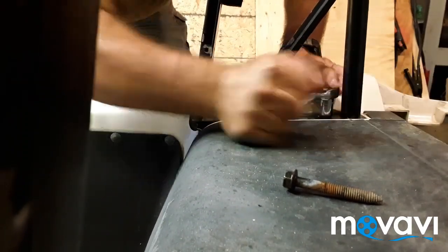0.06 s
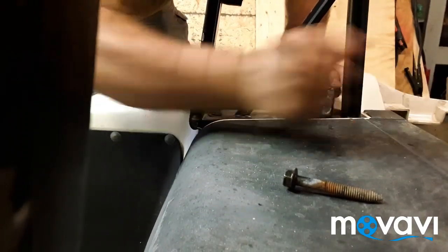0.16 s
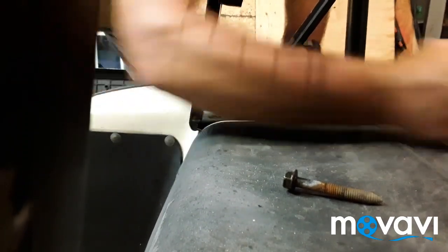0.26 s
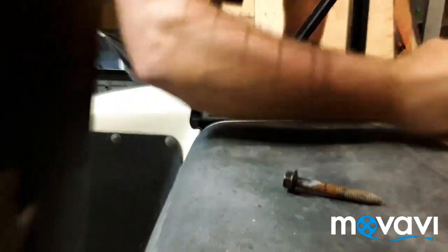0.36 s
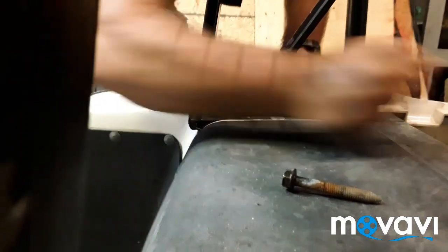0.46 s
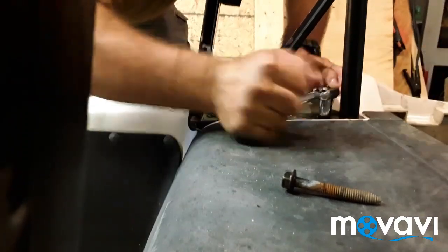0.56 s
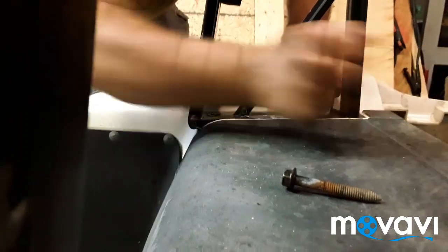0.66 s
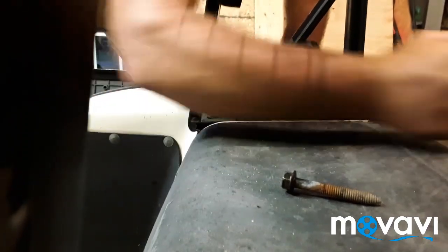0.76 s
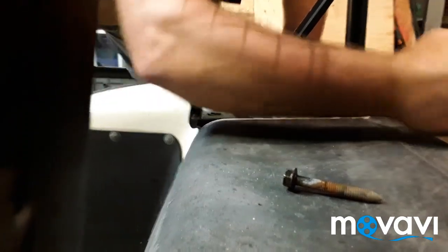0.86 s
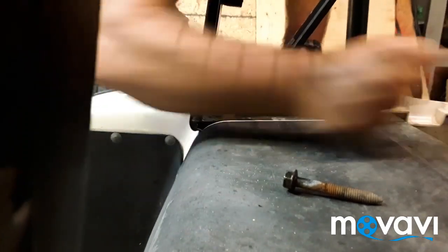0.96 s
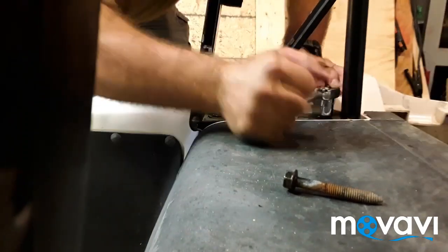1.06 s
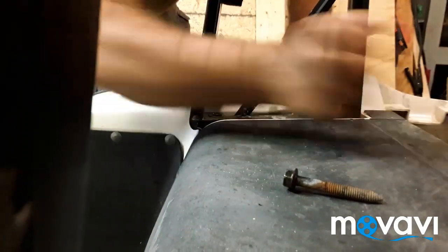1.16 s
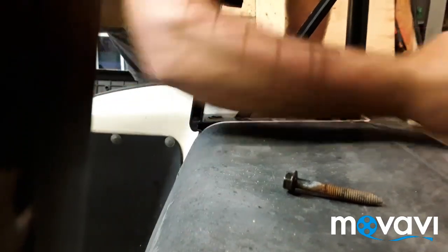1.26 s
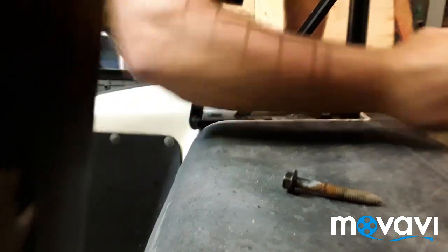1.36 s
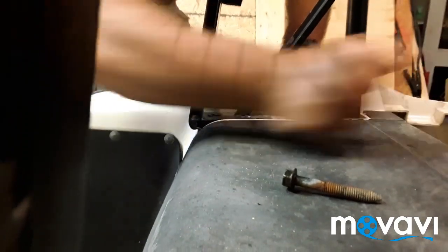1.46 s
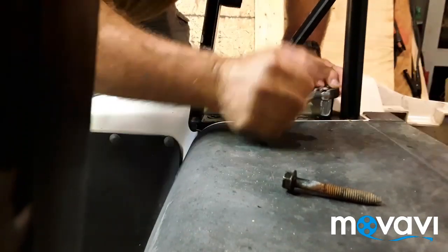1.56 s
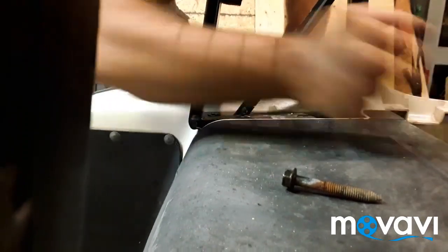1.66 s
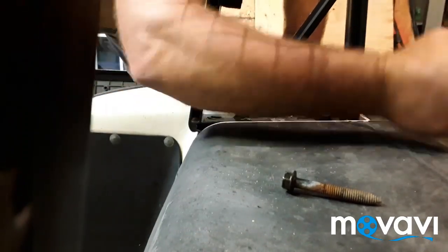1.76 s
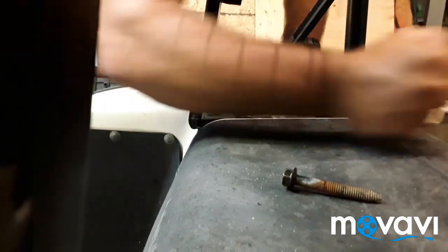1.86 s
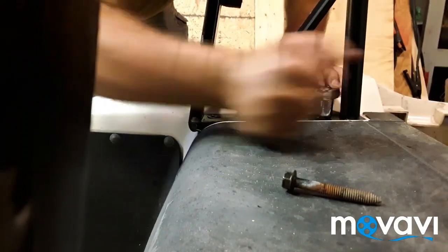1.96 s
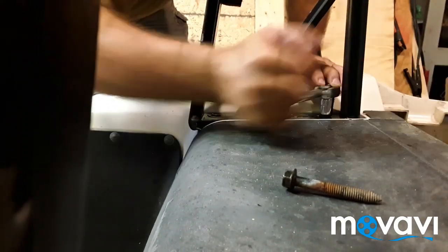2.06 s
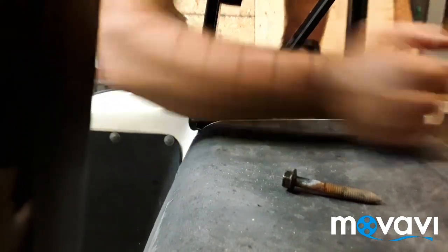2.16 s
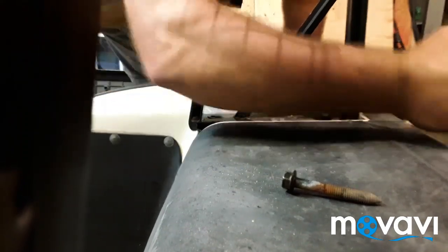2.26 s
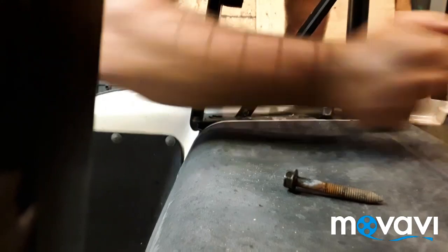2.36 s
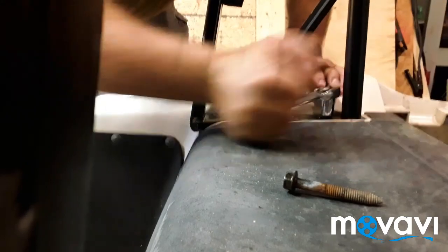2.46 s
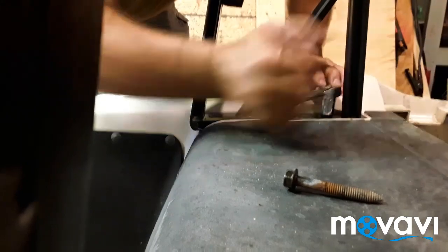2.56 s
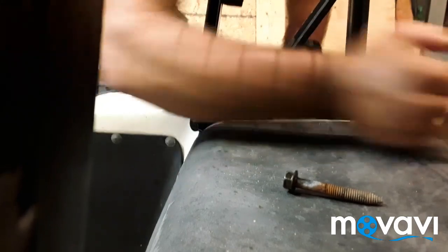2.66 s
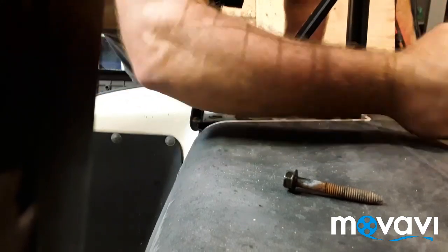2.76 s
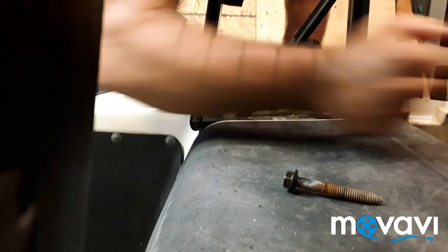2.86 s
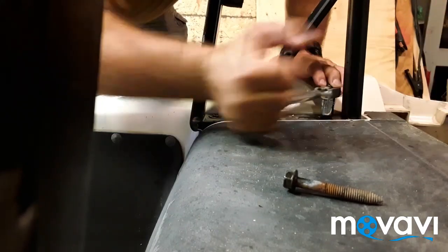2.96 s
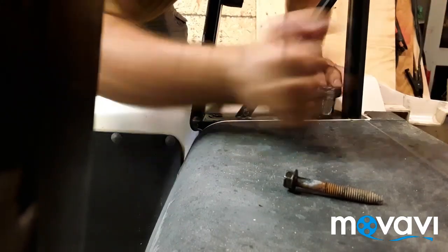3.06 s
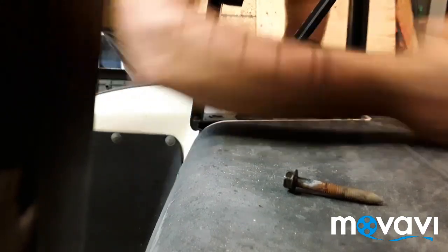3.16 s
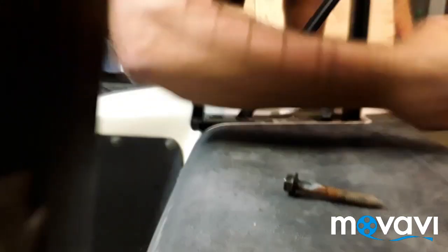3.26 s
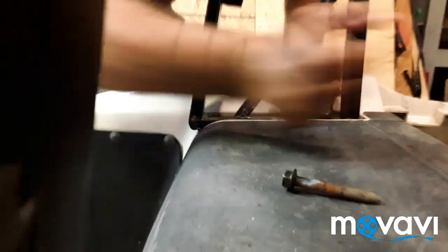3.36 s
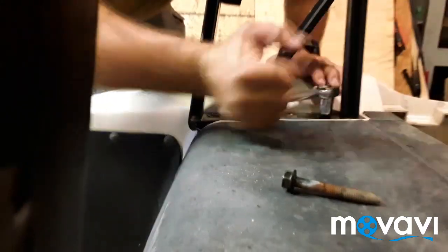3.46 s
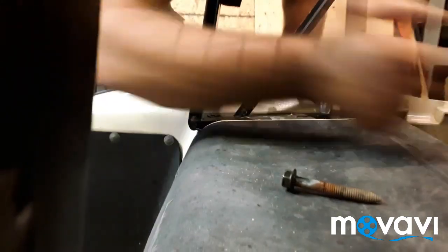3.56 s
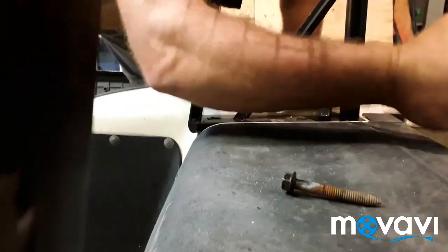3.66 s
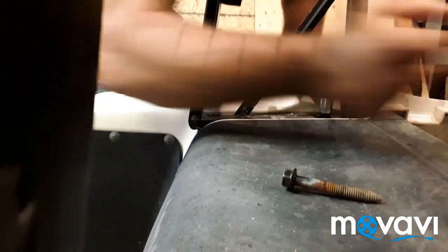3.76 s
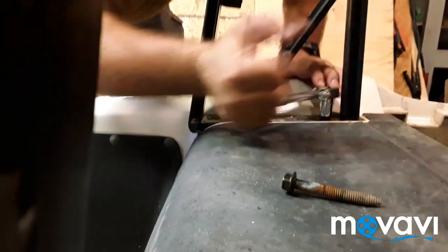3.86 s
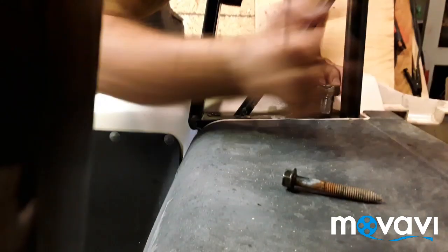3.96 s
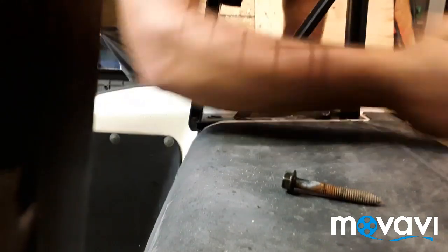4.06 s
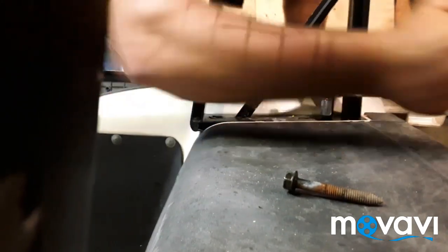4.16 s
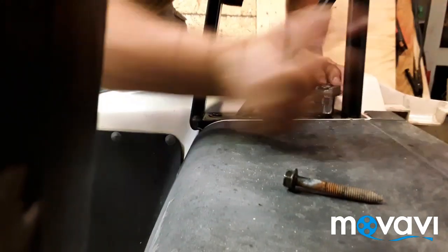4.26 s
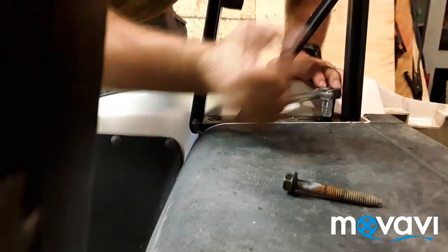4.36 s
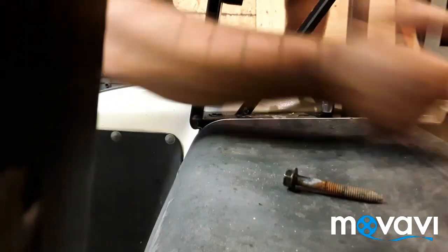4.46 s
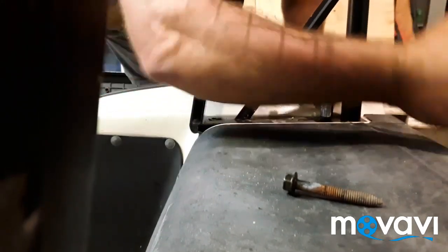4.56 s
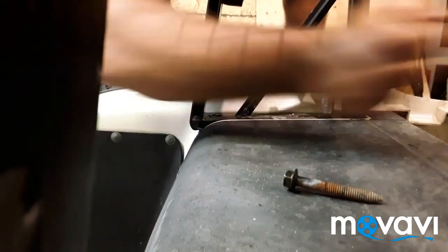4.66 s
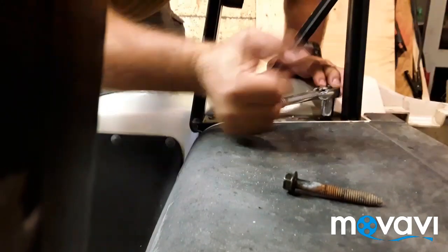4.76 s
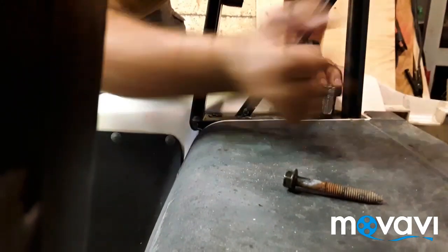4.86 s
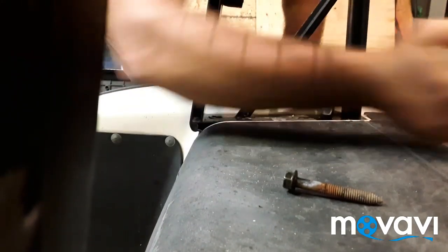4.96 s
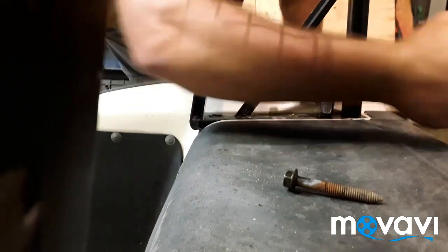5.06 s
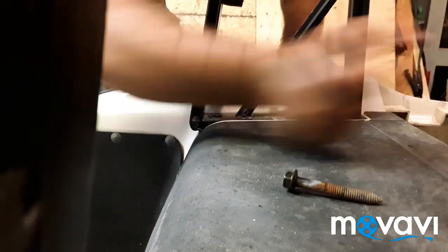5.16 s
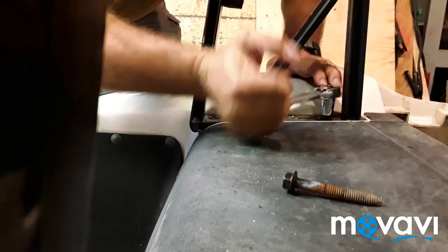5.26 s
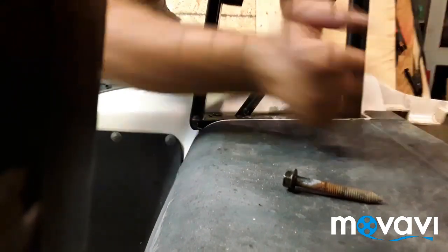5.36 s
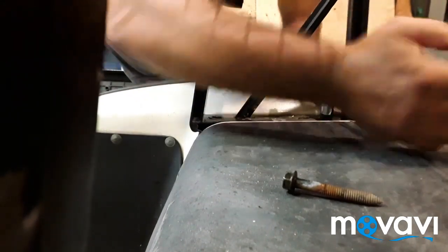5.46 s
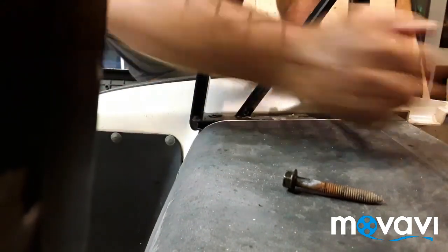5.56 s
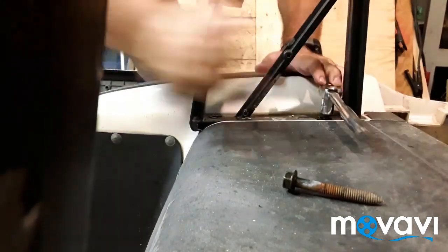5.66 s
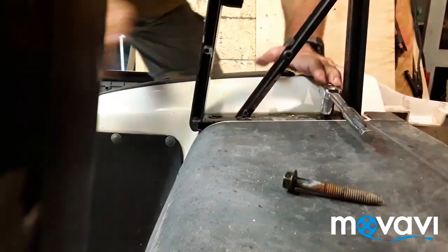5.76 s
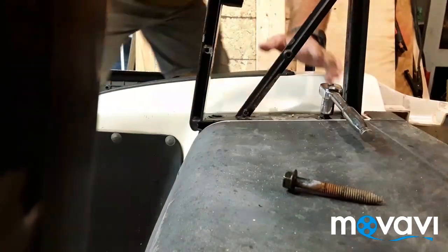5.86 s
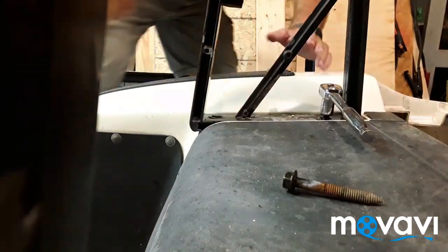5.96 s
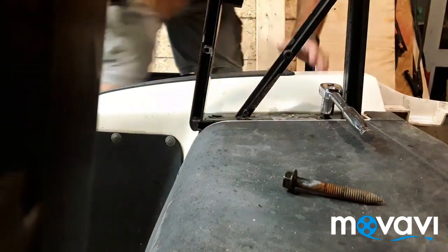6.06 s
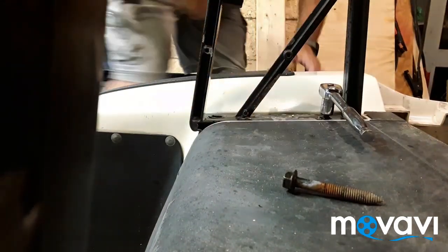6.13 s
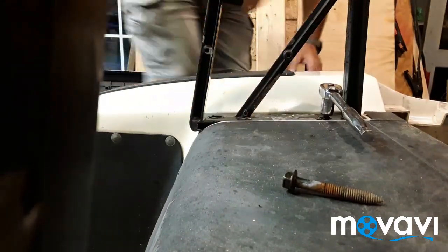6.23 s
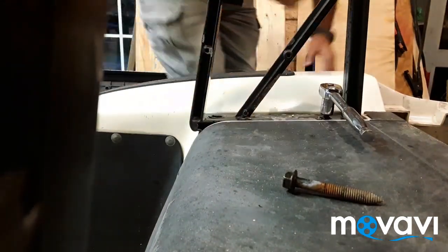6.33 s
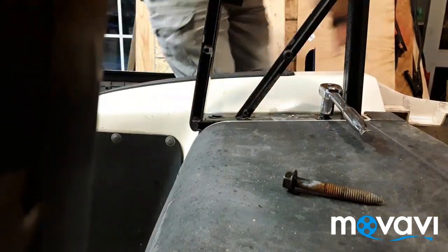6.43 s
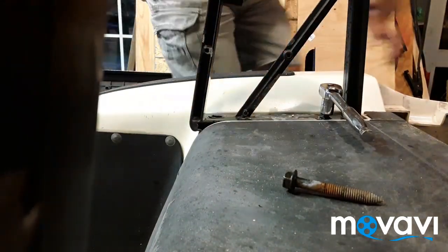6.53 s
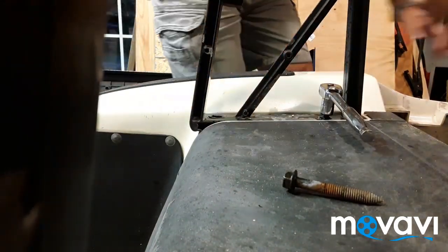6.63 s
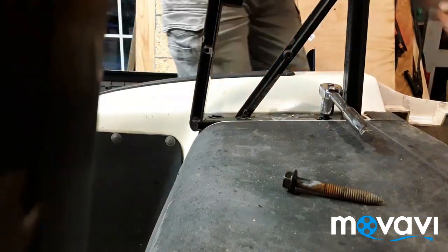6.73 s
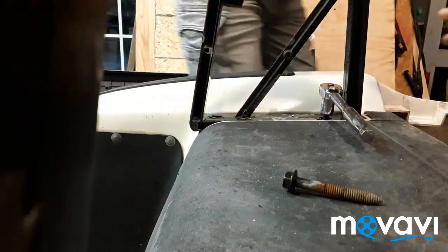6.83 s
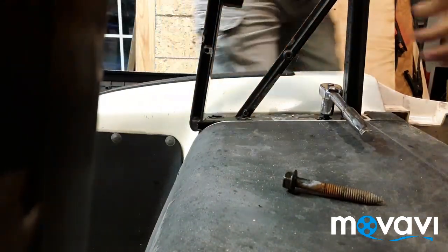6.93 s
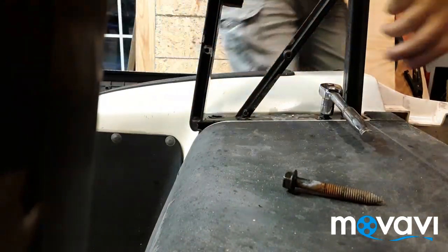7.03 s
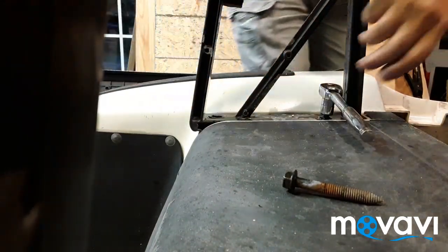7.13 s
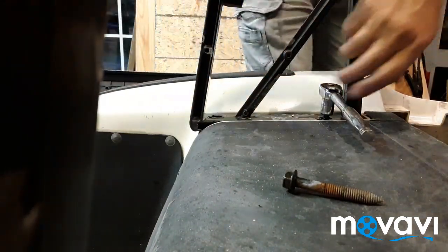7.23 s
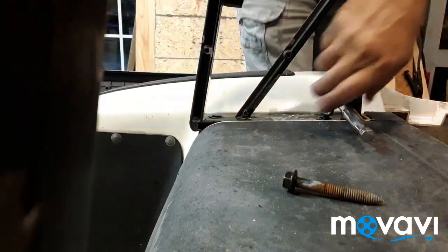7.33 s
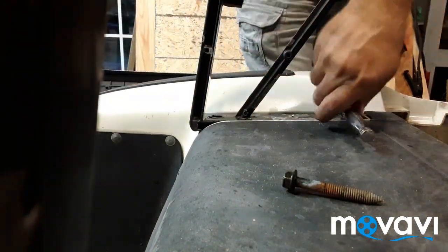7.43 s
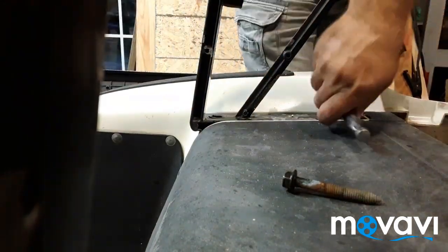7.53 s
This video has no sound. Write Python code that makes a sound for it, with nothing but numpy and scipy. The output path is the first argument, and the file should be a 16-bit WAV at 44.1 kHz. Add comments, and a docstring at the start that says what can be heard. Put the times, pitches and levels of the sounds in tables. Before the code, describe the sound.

In a small garage, a socket wrench ratchets close to one microphone: bright runs of four or five fast clicks, about twice a second. Between runs the socket knocks metallically against the bolt, the thread squeaks briefly, and a forearm bumps and rubs a dull plastic panel. After about five and a half seconds the ratcheting ends, leaving soft cloth rustle, faint ticks, a distant-sounding cricket and very low air noise.

```python
"""Ratchet on a rusty bolt

Small garage, one microphone: a socket ratchet backs a bolt out of a bracket on a vehicle's plastic body.
Noise bursts through resonances make the pawl's clicks, socket knocks and panel thuds; bare bursts make dry
ticks; pulse trains make the thread squeak; shaped noise is hand and arm rubbing, then trousers brushing as
the worker lets go and steps round. A cricket nearby chirps in sagging tones, over faint steady air noise.
"""
import sys
import numpy as np
from scipy import signal
from scipy.fft import rfft, irfft, next_fast_len
from scipy.io import wavfile
from scipy.ndimage import uniform_filter1d

SR = 44100
rng = np.random.default_rng(int(sys.argv[2]) if len(sys.argv) > 2 else 0)


def dump(signal):
    """Clip the signal to [-1, 1] and save it as 16-bit WAV at the path in sys.argv[1]."""
    limited = np.clip(np.atleast_2d(signal).T, -1, 1)
    pcm = np.round(limited * 32767).astype(np.int16)
    wavfile.write(sys.argv[1], SR, pcm)


N = 334719
TIME = np.arange(N) / SR
CUTOFF_HZ = 16200

# All event levels below are before the trims (snap_db, tap_db ...) in each function's arguments.
# socket taking up its slack against the bolt head: start_s, level_db, treble_db
SLACK_KNOCKS = [(0.376, -28.5, -54), (1.357, -20, -27.5), (1.93, -35, -37), (2.323, -22, -36),
                (2.842, -34.5, -62), (3.182, -34, -27), (3.27, -16, -20.5), (3.304, -27, -38),
                (3.733, -21.5, -32), (4.074, -34.5, -30), (4.164, -17.5, -21), (4.628, -23.5, -32.5),
                (5.089, -21.5, -25.5), (5.368, -29.5, -48), (5.675, -44, -59), (5.927, -46.5, -51),
                (6.439, -47, -57), (7.294, -67, -66), (7.413, -55.5, -60)]
# ring of the steel ratchet head: pitch_hz, width_hz, level_db (above the snap)
HEAD_RING = [(7050, 79, -1.5), (6900, 120, -19), (7626, 83, 18.5), (8297, 410, 17), (11290, 400, 8),
             (12980, 300, 5)]
# ring of bolt and bracket: pitch_hz, width_hz, level_db (above the blow)
BRACKET_RING = [(655, 70, 15.5), (860, 190, 6), (1072, 14, 7), (1162, 64, 8.5), (1392, 89, 4.5),
                (1790, 41, -17.5), (1943, 11, 14), (2160, 19, 2.5), (2313, 120, 10.5), (2695, 19, 9.5),
                (3166, 200, 12)]
# colour of steel snapping on steel: pitch_hz, level_db (per Hz)
SNAP_COLOUR = [(1000, -29.5), (3000, -9.5), (4500, -2), (6000, -4), (8000, 2), (9000, 0), (10000, -4.5),
               (12500, -9.5), (16000, -22.5)]
# dull colour of the leaned-on or struck panel: pitch_hz, level_db (per Hz)
RUMBLE_COLOUR = [(25, -20.5), (50, -19.5), (85, -3.5), (130, 1.5), (260, -2), (450, -7), (900, -14),
                 (3000, -64)]


def from_db(db):
    """Decibels to gain."""
    return 10 ** (np.asarray(db) / 20)


def rms_one(x):
    """Scale to unit rms."""
    return x / np.sqrt(np.mean(x ** 2) + 1e-20)


def peak_one(x, size):
    """Scale so that the loudest stretch of `size` samples has unit rms."""
    return x / np.sqrt(uniform_filter1d(x ** 2, size).max() + 1e-20)


def at_hz(points, hz):
    """Read a table on a log-frequency axis."""
    f, value = np.transpose(points)
    return np.interp(np.log(np.maximum(hz, 1)), np.log(f), value)


def add(out, s, sound):
    """Mix a sound in at time s."""
    i = max(int(s * SR), 0)
    out[i:i + len(sound)] += sound[:max(N - i, 0)]


def drift(rate, size):
    """Random line through `rate` points a second, within +-2 and with a spread of about 1."""
    knots = np.arange(size) * rate / SR
    return np.interp(knots, np.arange(size), rng.uniform(-2, 2, size))


def colour(x, spectrum, modes=(), vary_db=0):
    """Causal filter: a smooth spectrum with resonances, each excited with a strength of its own."""
    size = next_fast_len(len(x) + 4096) * 2
    hz = np.arange(size // 2 + 1) * SR / size
    power = np.ones(len(hz))
    for centre, width, db in modes:
        peak = from_db(db + vary_db * rng.standard_normal()) ** 2
        power += peak / (1 + (2 * (hz - centre) / width) ** 2)
    cepstrum = irfft(np.log(from_db(at_hz(spectrum, hz)) * np.sqrt(power)))
    # minimum phase: nothing sounds before its cause
    cepstrum[1:size // 2] *= 2
    cepstrum[size // 2 + 1:] = 0
    response = np.exp(rfft(cepstrum))
    return irfft(rfft(x, size) * response)[:len(x)]


def burst(t60, size, delay=0):
    """A rough burst: noise that starts after `delay` and falls by 60 dB in t60 seconds."""
    t = TIME[:size] - delay
    return rng.standard_normal(size) * (t >= 0) * from_db(-60 * np.abs(t) / t60)


def garage(x, wet_db, build_s):
    """Direct sound plus a diffuse tail that builds up and dies band by band."""
    # garage reverberation: pitch_hz, t60_s
    decay_times = [(100, 0.42), (500, 0.21), (2000, 0.35), (5000, 0.42), (8500, 0.33), (15000, 0.39)]
    t, tail = TIME[:SR * 3 // 4], 0
    white, hz = rfft(rng.standard_normal(len(t))), np.fft.rfftfreq(len(t), 1 / SR)
    edges = np.geomspace(30, SR / 2, 13)
    for low, high in zip(edges, edges[1:]):
        band = irfft(white * (hz >= low) * (hz < high), len(t))
        tail = tail + band * from_db(-60 * t / at_hz(decay_times, np.sqrt(low * high)))
    tail = tail * (1 - np.exp(-t / build_s))
    return x + from_db(wet_db) * signal.fftconvolve(x, tail / np.linalg.norm(tail))[:N]


def background_air(level_db=-66.5):
    """Faint steady background: noise of one fixed colour."""
    # pitch_hz, level_db (per Hz)
    air_colour = [(25, -16.5), (60, -4), (120, 1.5), (300, 3.5), (700, -1.5), (1500, -18), (2300, -20.5),
                  (3200, -40.5), (6500, -30.5), (8300, -11), (10500, -32), (16000, -39.5)]
    return from_db(level_db) * rms_one(colour(rng.standard_normal(N), air_colour))


def handling(rumble_db=-1.5, scuff_db=-6.0, lumpy_db=5.5, grain_db=5.5):
    """Hand and arm lean and rub on the panel; harder pressure raises rumble and scuff together."""
    # pressure of hand and arm on wrench and panel, as rubbing level: time_s, level_db
    pressure = [(0, -57.5), (0.55, -49), (1.0, -54), (1.72, -42.5), (1.95, -61), (2.45, -44.5),
                (3.1, -54.5), (3.4, -37.5), (3.9, -52), (4.3, -42), (4.95, -50.5), (5.4, -40.5),
                (5.55, -57), (5.75, -52.5), (6.0, -77), (6.45, -66), (7.2, -71), (7.5, -64.5)]
    # colour of the rubbing: pitch_hz, level_db (per Hz)
    scuff_colour = [(250, 3), (600, -19), (1200, 8.5), (2300, 2.5), (3500, -8), (6500, -10), (8300, 9.5),
                    (10000, -12), (16000, -32)]
    pressure_db = np.interp(TIME, *np.transpose(pressure))
    rumble_level = from_db(rumble_db + lumpy_db * drift(40, size=N))
    rumble = rms_one(colour(rng.standard_normal(N), RUMBLE_COLOUR)) * rumble_level
    scuff_level = from_db(scuff_db + grain_db * drift(60, size=N))
    scuff = rms_one(colour(rng.standard_normal(N), scuff_colour)) * scuff_level
    return from_db(pressure_db) * (rumble + scuff)


def clicks():
    """Teeth pass evenly on each swing, the last one late as the hand brakes: (s, snap, bracket, ping dB)."""
    # return swings of the handle: start_s, teeth_count, tooth_s (per tooth), late_s (last tooth),
    # snap_db, bracket_db (passed into the bracket), ping_db (socket)
    swings = [(0.0687, 4, .030, .006, -15, -37, -36), (0.538, 5, .0306, .018, -16.5, -39, -37),
              (1.0534, 4, .0305, .0073, -14, -35, -33), (1.5135, 4, .0324, 0, -12, -32, -31),
              (2.0062, 4, .0306, .0114, -11.5, -33, -25), (2.4634, 5, .0281, .005, -11.5, -32, -34),
              (2.9732, 4, .0282, .002, -14, -32, -37), (3.4049, 5, .027, .0077, -11.5, -30, -35),
              (3.8636, 4, .0274, .0054, -11.5, -30.5, -44), (4.2971, 5, .0256, 0, -11.5, -31.5, -43),
              (4.755, 5, .0255, .0126, -13, -31, -35), (5.2235, 5, .027, .016, -11.5, -31, -38)]
    # single clicks outside the even runs: start_s, snap_db
    lone_clicks = [(0.0014, -19.5), (1.1891, -19), (1.4092, -24)]
    lone_tap_db, lone_ping_db = -19, -23.5   # relative to the snap
    # the socket is still tight on the first tooth; the hand gathers force
    first_ping_db, snap_rise_db_per_tooth = -12.5, 0.35
    snap_spread_db, ping_spread_db = 1.4, 5   # from tooth to tooth
    rows = [(s, db, db + lone_tap_db, db + lone_ping_db) for s, db in lone_clicks]
    for start, count, tooth_s, late_s, db, bracket_db, socket_db in swings:
        for k, (force, seating) in enumerate(rng.standard_normal((count, 2))):
            rows.append((start + k * tooth_s + late_s * (k == count - 1),
                         db + snap_rise_db_per_tooth * (k - count / 2) + snap_spread_db * force,
                         bracket_db + snap_spread_db * force,
                         socket_db + first_ping_db * (k == 0) + ping_spread_db * seating))
    return rows


def ratchet(snap_db=-6.5, tap_db=-1.0, ping_db=-5.0, snap_t60=0.0096, tap_t60=0.055, ping_t60=.025,
            ping_hz=4170, rebound_s=.0028, rebound_db=1.0):
    """The pawl snaps and rebounds at each click; the head rings, the socket pings, the bracket is tapped."""
    # colour of the tap passed to the bracket: pitch_hz, level_db (per Hz)
    tap_colour = [(150, -7), (500, -1.5), (900, -7), (1600, 5.5), (2500, -1), (3500, -10.5), (6000, -21)]
    out, pings, t = np.zeros(N), np.zeros(N), TIME[:3000]
    for s, db, bracket_db, socket_db in clicks():
        rebound_gain = from_db(rebound_db + 2 * rng.standard_normal())
        rebound = rebound_gain * burst(snap_t60, size=3000, delay=rebound_s * rng.uniform(0.23, 1.4))
        snap = colour(burst(snap_t60, size=3000) + rebound, SNAP_COLOUR, HEAD_RING, vary_db=2.0)
        tap = colour(burst(tap_t60, size=6000), tap_colour, BRACKET_RING, vary_db=3.0)
        # the socket sits a little differently at every click
        seated_hz = ping_hz * (1 + 0.012 * rng.standard_normal())
        ping = np.sin(2 * np.pi * seated_hz * t) * from_db(-60 * t / ping_t60)
        add(out, s, from_db(db + snap_db) * peak_one(snap, size=130))
        add(out, s, from_db(bracket_db + tap_db) * peak_one(tap, size=400))
        add(pings, s, from_db(socket_db + ping_db) * peak_one(ping, size=400))
    return garage(out, wet_db=-2.0, build_s=0.002) + garage(pings, wet_db=-6.5, build_s=0.0015)


def thread(squeak_db=-1.0, jitter=0.0736, wander=.04, flutter_db=2.0):
    """Stick-slip in the rusty thread: a pulse per slip, its rate gliding with the pull; rust adds wander, grit."""
    # thread sticking and slipping: start_s, hold_s, release_s, start_hz (slips per s),
    # full_hz (slips per s at full pull), held_db, unevenness (0-1), grit_db (relative to the slips)
    squeaks = [(0.283, 0.1, 0.044, 960, 1320, -19, 0.8, 2.5),
               (0.837, .038, 0.11, 770, 885, -16, 0.54, -3.5),
               (1.267, 0.015, 0.034, 1150, 1220, -22, 0.5, -2),
               (2.207, 0.0099, 0.05, 3100, 3020, -21.5, .45, -15.5),
               (4.088, 0.018, 0.066, 2900, 3130, -20, .55, -25)]
    # colour of a slip: pitch_hz, level_db (per Hz)
    slip_colour = [(300, -27.5), (800, 0), (1300, -1.5), (2500, -2), (3400, -10.5), (4600, -9),
                   (6000, -4.5), (7200, 0.5), (8700, 4.5), (10000, -11), (12500, -19), (16000, -40.5)]
    # ring of the bolt shank while it squeaks: pitch_hz, width_hz, level_db (above the slip)
    shank_ring = [(2270, 160, 4), (2760, 450, -12.5), (4270, 190, 12), (5820, 130, 9.5), (7800, 200, 4.5),
                  (8400, 200, 6.5)]
    attack_s, onset_db, release_db = .005, -7.5, -23   # levels at start and end, relative to the hold
    sag = .07   # share by which the slip rate drops as the pull relaxes
    out = np.zeros(N)
    for s, hold_s, release_s, start_hz, full_hz, held_db, rough, grit_db in squeaks:
        end_s = hold_s + release_s
        t = np.arange(0, end_s, 1 / SR)
        hz = np.interp(t, [0, hold_s, end_s], [start_hz, full_hz, full_hz * (1 - sag)])
        attack = onset_db * np.maximum(1 - t / attack_s, 0)
        release = release_db * np.maximum(t - hold_s, 0) / release_s
        db = held_db + attack + release
        unevenness = jitter * drift(900, size=len(t)) + wander * drift(160, size=len(t))
        phase = 2 * np.pi * np.cumsum(hz * (1 + rough * unevenness)) / SR
        slips = rms_one(sum(np.cos(k * phase) * (k * hz < CUTOFF_HZ) for k in range(1, 20)))
        grit = from_db(grit_db) * rng.standard_normal(len(t))
        squeak = colour(slips + grit, slip_colour, shank_ring)
        # level out the ringing, so that the pull and a light flutter set the loudness
        squeak /= np.sqrt(uniform_filter1d(squeak ** 2, size=400) + 1e-12)
        add(out, s, squeak * from_db(db + squeak_db + flutter_db * drift(300, size=len(t))))
    return garage(out, wet_db=-3.0, build_s=0.0004)


def knocks(blow_db=-3.5, clink_db=-8.0, blow_t60=0.086, clink_t60=0.1, ring_db=2.5):
    """The socket slams against the bolt head: the bracket rings and the wrench clinks."""
    # colour of the blow: pitch_hz, level_db (per Hz)
    blow_colour = [(100, -26), (300, 9), (700, -6), (1300, 2), (2200, -4.5), (3300, -18.5), (5000, -8),
                   (12000, -36.5)]
    ringing = [(hz, width, mode_db + ring_db) for hz, width, mode_db in BRACKET_RING]
    out = np.zeros(N)
    for s, db, treble_db in SLACK_KNOCKS:
        blow = colour(burst(blow_t60, size=14000), blow_colour, ringing, vary_db=1.5)
        clink = colour(burst(clink_t60, size=4000), SNAP_COLOUR, HEAD_RING, vary_db=0.5)
        add(out, s, from_db(db + blow_db) * peak_one(blow, size=500))
        add(out, s, from_db(treble_db + clink_db) * peak_one(clink, size=400))
    return garage(out, wet_db=-4.5, build_s=0.0024)


def panel(thud_db=-4.0, thud_t60=0.075, width_hz=60, ring_db=5.5):
    """The plastic body gives with a dull, well damped thud under every bump and every knock of the socket."""
    # the forearm bumping the plastic panel: start_s, level_db, pitch_hz
    bumps = [(0.442, -33.5, 122), (0.537, -28, 310), (0.57, -29, 135), (0.904, -28.5, 228),
             (1.016, -30.5, 312), (1.424, -20, 263), (1.547, -29, 220), (1.666, -22.5, 125),
             (1.761, -30, 236), (2.335, -24, 235), (2.845, -27.5, 334), (3.328, -15, 243),
             (4.244, -29.5, 131), (4.322, -29, 140), (4.504, -22.5, 165), (5.362, -20, 202)]
    usual_knock_db, follows = -16.5, 0.51   # share of a knock's extra force, in dB, that reaches the panel
    answer_db, answer_hz, lag_s = -26, 287, 0.00311   # panel's answer to a knock of usual_knock_db
    answers = [(s + lag_s, answer_db + follows * (db - usual_knock_db), answer_hz)
               for s, db, _ in SLACK_KNOCKS]
    out = np.zeros(N)
    for s, db, hz in bumps + answers:
        thud = colour(burst(thud_t60, size=9000), RUMBLE_COLOUR, [(hz, width_hz, ring_db)])
        add(out, s, from_db(db + thud_db) * peak_one(thud, size=300))
    return garage(out, wet_db=-3.5, build_s=0.0081)


def ticks(tick_db=0.0, tick_t60=0.0055):
    """Single dry ticks, very short and sharp, without any room."""
    # tiny dry ticks: start_s, level_db
    tick_events = [(0.4649, -19.5), (5.9163, -40.5), (7.5622, -40.5)]
    # pitch_hz, level_db (per Hz)
    tick_colour = [(500, 6), (3000, -8), (9000, 7.5), (16000, -24)]
    out = np.zeros(N)
    for s, db in tick_events:
        tick = colour(burst(tick_t60, size=1000), tick_colour)
        add(out, s, from_db(db + tick_db) * peak_one(tick, size=44))
    return out


def cricket(start_hz=4640, fall_hz=290, first_flat_hz=70, period_s=0.043, stroke_s=0.0258,
            first_db=-5.5, second_db=-12.0, third_db=-31.5, level_db=-0.5):
    """Four wing strokes a chirp, the first weaker and flatter; each tone sags as the wing slows."""
    # start_s, level_db
    chirps = [(1.757, -38.5), (2.271, -45), (2.751, -39.5), (3.422, -40.5), (3.847, -39), (4.311, -41.5),
              (5.442, -40), (6.026, -43), (6.772, -47)]
    out, u = np.zeros(N), np.arange(0, 1, 1 / (stroke_s * SR))   # u: share of the stroke done
    for s, db in chirps:
        for k in range(4):
            hz = start_hz - fall_hz * u ** 2 - first_flat_hz * (k == 0) + 20 * drift(340, size=len(u))
            phase = 2 * np.pi * np.cumsum(hz) / SR
            overtones = from_db(second_db) * np.sin(2 * phase) + from_db(third_db) * np.sin(3 * phase)
            tone = np.sin(phase) + overtones
            stroke = tone * np.sin(np.pi * u)
            add(out, s + k * period_s, stroke * from_db(db + level_db + first_db * (k == 0)))
    return garage(out, wet_db=2.0, build_s=0.0037)


def trousers(rustle_db=0.0, flutter_db=2.5, rise_db_per_s=83, fall_db_per_s=89):
    """Cloth slides over cloth in soft swells, step by step."""
    # trouser legs brushing as the worker steps round the vehicle: peak_s, level_db
    swishes = [(5.78, -53), (6.12, -58.5), (6.27, -60.5), (6.43, -52.5), (6.66, -50), (6.899, -53),
               (7.181, -66.5), (7.5, -66.5)]
    # pitch_hz, level_db (per Hz)
    cloth_colour = [(400, -24), (1200, -10.5), (2300, -6.5), (3600, -14), (6500, -11), (8500, 3.5),
                    (10500, -19.5), (16000, -34.5)]
    swells = [db - np.maximum(rise_db_per_s * (s - TIME), fall_db_per_s * (TIME - s)) for s, db in swishes]
    flutter = from_db(rustle_db + flutter_db * drift(30, size=N))
    level = np.linalg.norm(from_db(swells), axis=0) * flutter
    return rms_one(colour(rng.standard_normal(N), cloth_colour)) * level


def scene():
    """All sources at one microphone over a faint steady background."""
    wrench = ratchet() + thread() + knocks()
    worker = handling() + panel() + trousers()
    return (background_air() + wrench + worker + ticks() + cricket())[None]


def record(dry):
    """The loudest peaks are rounded off, then the top is cut steeply."""
    ceiling = .48
    rounded = ceiling * np.tanh(dry / ceiling)
    top_cut = signal.ellip(10, .1, 80, CUTOFF_HZ, fs=SR, output="sos")
    return signal.sosfilt(top_cut, rounded)


dry = scene()
out = record(dry)
dump(out)
```